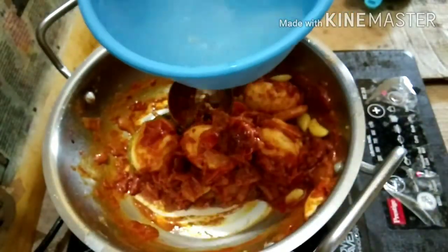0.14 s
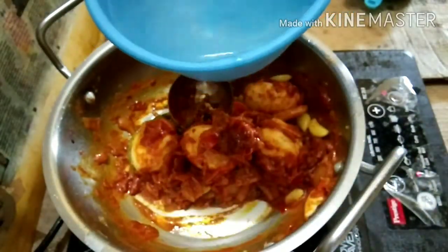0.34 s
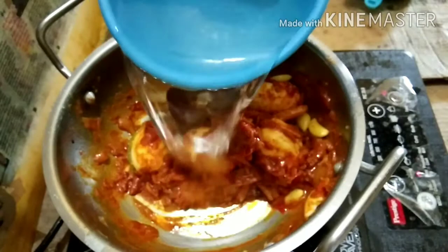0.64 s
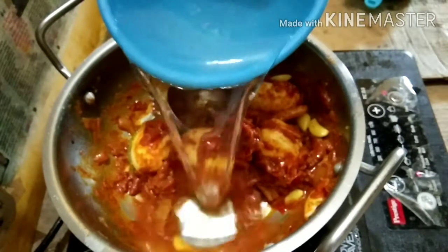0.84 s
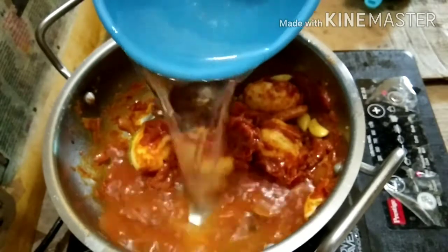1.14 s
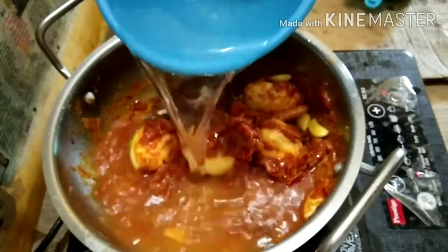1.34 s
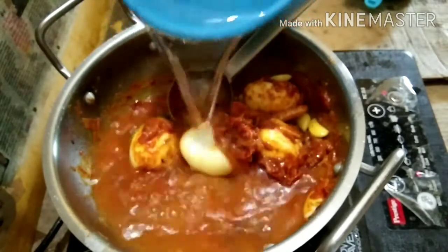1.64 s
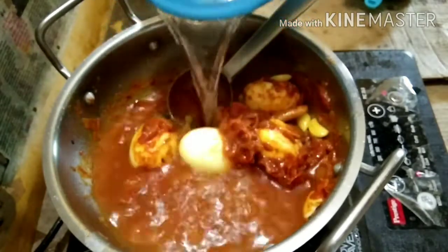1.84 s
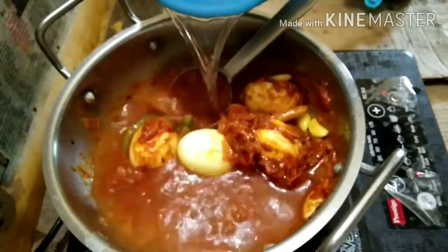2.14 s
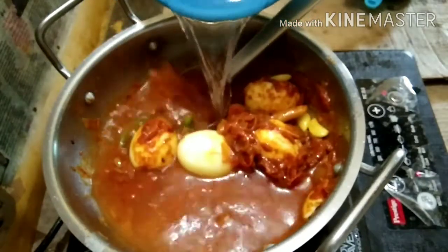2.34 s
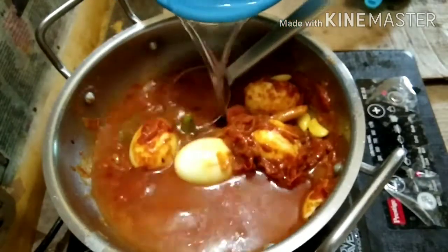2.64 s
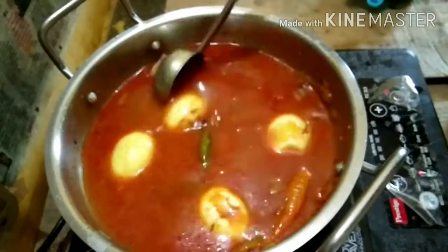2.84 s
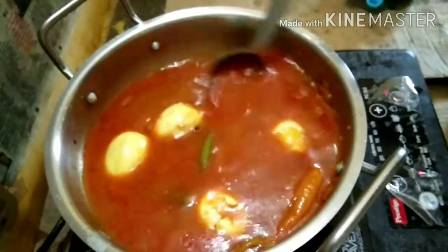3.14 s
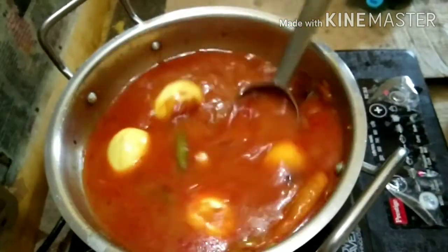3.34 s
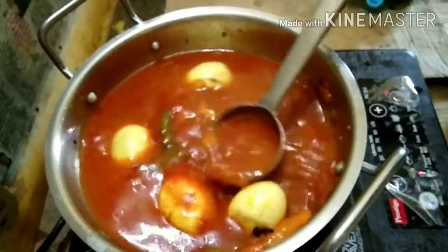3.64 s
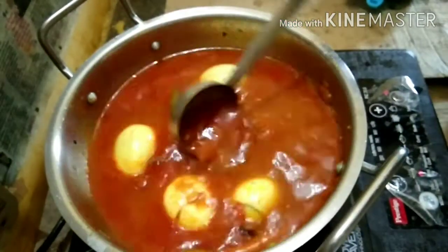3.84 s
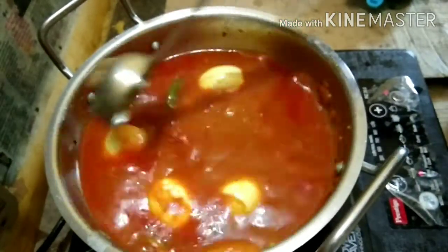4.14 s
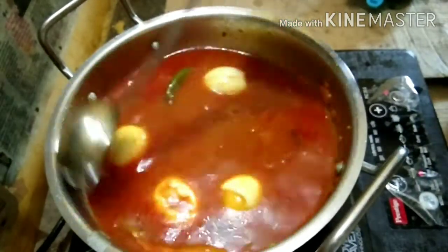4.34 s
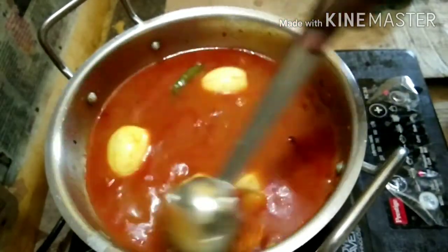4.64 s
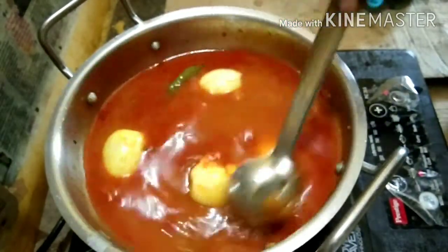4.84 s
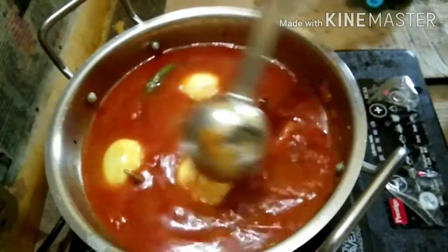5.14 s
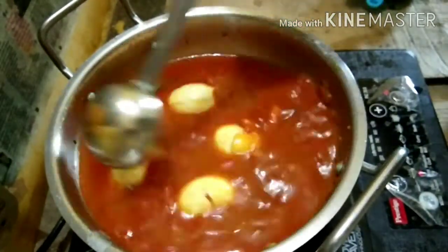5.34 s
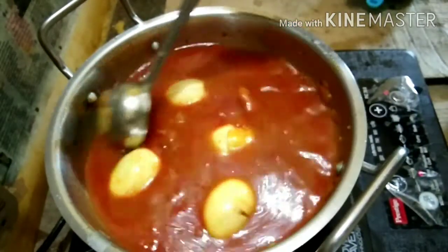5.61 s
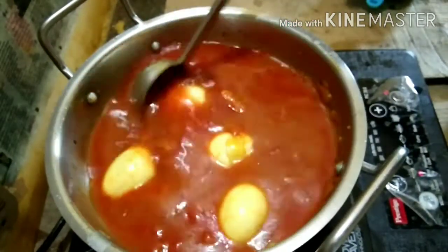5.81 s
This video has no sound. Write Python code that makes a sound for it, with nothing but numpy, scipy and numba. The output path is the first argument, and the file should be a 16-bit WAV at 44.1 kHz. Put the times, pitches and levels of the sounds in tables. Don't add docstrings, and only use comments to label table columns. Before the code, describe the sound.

A kitchen heard closely through a phone microphone, slightly dull and overloaded at peaks, with short hard-wall echo. A fan hums and blows steadily over faint simmering and distant vehicle rumble. From 0 to 1.4 seconds water pours into a steel pan of curry: rapid ringing bubbles, gurgles and crisp spitting spray, thinning mid-way as the pool deepens, then splashing up again. A sharp cut with a tiny tick follows. A steel ladle rubs and squeaks on the pan from 1.5, ticking lightly around 1.8 to 2.6 while gravy swishes. A very loud, bright clank with quick bounces rings at 2.9, followed by small squeaks. Another strong clank comes at 4.15, then scrapes, ticks and faint pings. At 4.6 a heavy low puff of air thumps the microphone, fading by 5. Scrapes at 5.0 and 5.5 lead to a softer, lower clank at 5.74 and a last swish.

```python
import sys
import numpy as np
from scipy import signal
from scipy.io import wavfile
from scipy.ndimage import uniform_filter1d
from numba import njit

SR = 44100
rng = np.random.default_rng(int(sys.argv[2]) if len(sys.argv) > 2 else 0)


def boost_factor(decibels):
    exponent = np.asarray(decibels, float) / 20
    return 10 ** exponent


def put_to_file(sound):
    columns = np.atleast_2d(sound).T
    safe = np.clip(columns, -1, 1)
    whole_steps = np.round(safe * 32767)
    wavfile.write(sys.argv[1], SR, whole_steps.astype(np.int16))


N = 263541
CUT_S = 1.4335


def level(x, db):
    return x * boost_factor(db) / np.sqrt(np.mean(x ** 2))


@njit
def svf(x, hz, width):
    y, b, l = np.empty(len(x)), 0., 0.
    for i in range(len(x)):
        g, k = np.tan(np.pi * hz[i] / SR), width[i] / hz[i]
        v = (b + g * (x[i] - l)) / (1 + g * (g + k))
        b, l, y[i] = 2 * v - b, l + 2 * g * v, k * v
    return y


def band(x, hz, width):
    hz = np.clip(hz + np.zeros(len(x)), 20, 9000)
    return svf(x, hz, np.clip(width + np.zeros(len(x)), 3, 9000))


def band_twice(x, hz, width):
    return band(band(x, hz, width), hz, width)


@njit
def grains(s, size, hz, t60, glide, rise):
    out = np.zeros(N)
    for k in range(len(s)):
        phase, i0 = 0., int(s[k] * SR)
        for i in range(i0, min(N, i0 + int(t60[k] * SR))):
            t = (i - i0) / SR
            phase += 2 * np.pi * hz[k] * (1 + glide * t / t60[k]) / SR
            out[i] += size[k] * np.sin(phase) * (1 - np.exp(-t / rise)) * 1000. ** (-t / t60[k])
    return out


def walk(rate):
    k = int(SR / rate)
    held = np.repeat(rng.standard_normal(N // k + 1), k)
    return 1.367 * uniform_filter1d(uniform_filter1d(held, k), k)[:N]


def burst(s, db, t60):
    t = np.arange(N) / SR - s
    return boost_factor(db) * (t >= 0) * 1000. ** (-np.abs(t) / max(t60, .002)) * rng.standard_normal(N)


def shot(s, db, t60, hz, width):
    out, i = np.zeros(N), int(s * SR)
    t = np.arange(min(N - i, SR // 4)) / SR
    noise = boost_factor(db) * 1000. ** (-t / max(t60, .002)) * rng.standard_normal(len(t))
    out[i:i + len(t)] = band(noise, hz, width)
    return out


def swells(rows, rise_s, fall_db_per_s):
    t = np.arange(N) / SR
    power = 0
    for s, db in rows:
        slope_db = np.minimum(20 * (t - s) / rise_s, -fall_db_per_s * (t - s))
        power = power + boost_factor(2 * (db + slope_db))
    return np.sqrt(power)


# time_s, level_db
FLOW = [(.05, -54.5), (.11, -50.5), (.27, -50.5), (.4, -51), (.54, -61.5), (.75, -58), (.95, -63),
        (1.2, -52.5), (1.42, -55)]


def stream():
    t = np.arange(N) / SR
    flow_db = np.interp(t, *np.transpose(FLOW))
    gurgle_hz = np.interp(t - .81, (-.03, .25), (3310, 2160))
    spray_hz = 4850 + 810 * np.minimum(t, CUT_S)
    plop_hz = 1494 + 0 * t
    out = 0
    for db, hz, octaves in ((-0.5, gurgle_hz, .3), (0.9, spray_hz, .33), (-3, plop_hz, .6)):
        where, pitch, life, size = rng.random((1500, 4)).T
        s = where * CUT_S
        own_hz = hz[(s * SR).astype(int)] * 2 ** (octaves * (2 * pitch - 1))
        own_hz = np.clip(own_hz, 900, 7500)
        swarm = grains(s, boost_factor(-2.8 * np.log(size)), own_hz, (15 + 40 * life) / own_hz, 0.14, 0.000059)
        flicker = boost_factor(3.5 * walk(30) + 3.3 * walk(180))
        hiss = flicker * band_twice(rng.standard_normal(N), hz, 1.9 * hz)
        out = out + boost_factor(flow_db + db) * (level(swarm, 0.5) + level(hiss, -0.4))
    return out


# start_s, peak_db, pitch_hz
BUBBLES = [(.058, -29, 3300), (0.093, -26, 3250), (0.106, -25, 3250), (.118, -28, 3200), (0.132, -26, 3210),
           (.183, -26, 3300), (.208, -25, 3250), (0.157, -16.5, 3250), (.197, -20.5, 3450),
           (0.226, -35, 1930), (0.269, -17.5, 3320), (.3381, -32, 3470), (0.373, -31, 1340),
           (0.417, -20, 3290), (0.449, -26.5, 3560), (0.6303, -27, 3470), (.645, -26, 3450),
           (.692, -22, 3300), (0.703, -22.5, 3540), (.732, -32, 2520), (0.756, -19, 3940),
           (.8116, -29.5, 2000), (.763, -25, 3500), (.856, -37.5, 2350), (0.889, -30.5, 1730),
           (0.891, -33, 1250), (0.9873, -33, 2400), (1.0286, -43, 1290), (1.04, -30, 2380),
           (1.132, -28, 1160), (1.195, -28, 1610), (1.292, -29, 2130), (1.344, -28.5, 2380),
           (1.3832, -28.5, 2450)]


def bubbles():
    s, peak_db, hz = np.transpose(BUBBLES)
    t60_s = np.minimum(58 / hz, 0.031)
    return grains(s, boost_factor(peak_db - 0.4), hz, t60_s, 0.088, 0.00089)


# start_s, peak_db, pitch_hz
SPITS = [(0.168, -25, 5330), (0.197, -26, 4600), (.2309, -16, 4600), (.2309, -15, 6400), (.233, -19, 5200),
         (.169, -25, 5900), (.196, -24, 4000), (.337, -19, 5900), (.326, -16, 5200), (0.266, -31, 4630),
         (0.289, -23, 4500), (0.3068, -18, 5220), (0.3252, -14, 4710), (.337, -13, 4700),
         (0.417, -21.5, 4520), (0.431, -19, 6100), (.48, -27, 4550), (.477, -27, 6700), (0.484, -26, 6550),
         (0.506, -19, 4550), (0.516, -16, 4400), (0.5774, -18, 6300), (0.6322, -19, 4440),
         (0.71, -23, 4570), (0.758, -18.5, 4180), (0.8915, -31, 5550), (0.9315, -31, 6030),
         (0.959, -22.5, 6200), (1.029, -15, 5630), (1.0413, -18, 5600), (1.13, -19, 5100),
         (1.168, -27, 6040), (1.195, -16, 5860), (1.2165, -19, 6380), (1.2535, -17, 6000),
         (1.272, -21, 6100), (1.285, -21, 6600), (1.293, -18.5, 6100), (1.185, -24, 6100),
         (1.208, -24, 5200), (1.226, -24, 6600), (1.408, -34, 5600), (.3068, -16, 6660), (.373, -22, 6600),
         (0.406, -23, 4700), (.465, -22, 4100), (.541, -32, 6300), (.5607, -29, 3720), (0.578, -22, 4530),
         (0.592, -22, 3970), (0.608, -26, 4860), (.649, -25, 4560), (.671, -27, 5100), (0.693, -33, 6760),
         (.785, -31, 3680), (.829, -36, 4570), (0.853, -28, 4400), (.868, -33, 4900), (.917, -26.5, 4070),
         (.985, -28, 4800), (1.0172, -24, 4060)]


def spits():
    t60_s = 0.027
    s, peak_db, hz = np.transpose(SPITS)
    out = grains(s, boost_factor(peak_db - 7), hz, t60_s + 0 * s, 0.11, 0.00083)
    for s, db, hz in SPITS:
        out = out + shot(s, db - 2.5, t60_s, hz, 0.14 * hz)
        out = out + shot(s, db - 8, 0.0035, hz, 0.69 * hz)
    return out


# start_s, length_s, pitch_hz, level_db
RUMBLE = [
    (0, .2, 64, -61.5),
    (.25, 0.66, 63.3, -57),
    (1.025, 0.5, 94, -57),
    (1.455, 0.33, 99, -52.5),
    (0, 5.97, 60.4, -66),
    (2.94, 0.27, 66, -58),
    (3.25, 0.47, 68, -64.5),
    (5.786, .2, 69, -60),
]


def rumble():
    t, noise = np.arange(N) / SR, rng.standard_normal(N)
    out = 0
    for s, length, hz, db in RUMBLE:
        fade = np.clip(np.minimum(t - s, s + length - t) / 0.031 + 1, 0, 1)
        out = out + fade * level(band_twice(noise, hz, 28), db)
    return out


# pitch_hz, level_db (per Hz)
KITCHEN = [(15, -82), (25, -39), (54, -26.5), (184, -10), (245, -8.5), (312, -4.5), (480, -10.5),
           (529, -17.5), (919, -13), (1090, -16.5), (1420, -19.5), (2580, -24.5), (2780, -28.5),
           (6440, -38), (7800, -84), (10100, -94), (17200, -120)]
# pitch_hz, level_db
FAN = [(140.0, -56.5), (209.9, -54), (246.2, -44), (279.9, -80.5), (489.9, -52.5), (737.5, -52.5),
       (845.2, -57.5), (985.1, -56), (1125, -55.5), (1265, -61.5)]


def kitchen():
    hz, db = np.transpose(KITCHEN)
    swell = walk(0.72)
    air = 0
    for f in 89 * 2 ** np.arange(0, 6.5, 1 / 3):
        band_db = np.interp(np.log(f), np.log(hz), db)
        flicker_db = 0.09 * swell + min(f / 600, 1.5) * walk(8.1)
        air = air + boost_factor(band_db + flicker_db) * band_twice(rng.standard_normal(N), f, f / 3)
    shaft = np.cumsum(1 + 0.00277 * walk(3)) / SR
    hum = sum(boost_factor(d - 0.5 + 1.32 * walk(11)) * np.sin(2 * np.pi * f * shaft + f) for f, d in FAN)
    return level(air, -43) + hum


# start_s, level_db
PUSHES = [
    (1.75, -40),
    (3.11, -43),
    (4.31, -34.5),
    (4.62, -50),
    (5.86, -41),
]


def swish():
    gain = boost_factor(-55.5) + swells(PUSHES, rise_s=0.086, fall_db_per_s=42.5)
    flicker = boost_factor(0.66 * walk(32) - 9.5)
    return gain * flicker * level(band(rng.standard_normal(N), 2300, 2600), 0)


# start_s, length_s, pitch_hz, level_db
SQUEAKS = [(1.574, 0.12, 2170, -47), (1.69, 0.15, 3190, -55), (1.575, .05, 5000, -53),
           (1.579, 0.1, 5740, -52), (2.08, 0.063, 2510, -56), (2.222, 0.057, 2620, -45),
           (2.399, 0.086, 2104, -51.5), (2.942, 0.22, 1934, -45), (3.06, .24, 3600, -42),
           (3.375, 0.05, 2440, -49), (3.36, 0.09, 3080, -53), (3.472, 0.033, 2570, -45.5),
           (3.49, 0.044, 2300, -44), (3.498, 0.049, 4610, -58), (3.666, 0.12, 2680, -46),
           (3.78, .09, 2670, -52), (3.71, 0.05, 2355, -51), (3.73, .04, 1980, -53),
           (3.546, 0.14, 2300, -52), (3.892, 0.043, 6300, -54.5), (3.9, 0.07, 4690, -45.5),
           (3.896, 0.03, 3170, -47.5), (3.92, .14, 3160, -52), (3.93, .13, 3620, -50),
           (3.93, .08, 4400, -47), (3.94, .05, 2150, -54), (4.298, .06, 2370, -49),
           (4.348, 0.039, 5070, -43), (4.423, 0.03, 3325, -46), (4.35, 0.026, 3380, -44),
           (4.6, 0.029, 2300, -49), (4.702, 0.056, 2497, -53), (5.058, 0.16, 5810, -47.5),
           (5.495, 0.16, 5310, -45), (5.51, .12, 4400, -45), (5.6, .12, 3900, -49), (5.555, .12, 2620, -46),
           (5.723, .025, 2900, -43), (5.66, 0.077, 1973, -47)]
RUBS = [(1.025, 0.036, 2400, -37), (1.031, 0.031, 6000, -37), (1.518, .095, 3700, -35.5),
        (1.591, 0.071, 4300, -46), (1.61, .13, 3100, -39), (1.518, .08, 4250, -41),
        (5.05, 0.089, 3160, -41), (5.59, 0.14, 3200, -44), (1.82, 0.12, 3500, -50.5),
        (2.23, 0.12, 3700, -58), (3.285, .12, 3920, -47.5), (3.36, 0.045, 2740, -50),
        (3.913, 0.11, 4020, -44), (4.098, .06, 4400, -44), (4.98, 0.083, 5850, -45.5),
        (5.011, 0.1, 5170, -34.5), (5.029, 0.09, 3900, -42.5), (5.058, 0.04, 6170, -36.5),
        (5.478, 0.031, 6170, -47), (5.495, 0.088, 5350, -44), (5.506, 0.11, 4400, -37.5),
        (5.802, 0.056, 2400, -48.5), (5.86, 0.073, 1330, -42.5), (5.848, 0.018, 4960, -44.5),
        (5.871, 0.056, 5900, -51), (2.94, 0.3, 371, -41.5), (4.288, 0.14, 343.5, -41.5),
        (5.764, 0.086, 353, -36)]
RATTLES = [(1.75, .12, 750, -47), (3.52, 0.24, 3600, -56), (1.6, .2, 2500, -50), (1.56, 0.13, 3900, -42),
           (1.82, 0.11, 5600, -43.5), (2.98, 0.17, 4300, -37.5), (4.32, .14, 5580, -39),
           (4.51, 0.12, 4100, -49.5), (4.699, 0.11, 4600, -49.5), (3.901, .15, 4200, -50.5),
           (5.01, 0.14, 4660, -39), (5.171, 0.1, 4650, -53), (5.5, 0.3, 4280, -47.5)]
# width (share of pitch), last over first pitch, steady tone (share),
# swell (share of length), fade_db_per_s
KINDS = [
    (.05, 0.985, .45, .22, 220),
    (.17, 0.948, 0.0, .08, 135),
    (.7, 0.91, 0.0, .12, 135),
]


def scrape():
    out = np.zeros(N)
    rows = [row + kind for table, kind in zip((SQUEAKS, RUBS, RATTLES), KINDS) for row in table]
    for s, length, first_hz, db, share, sag, steady, swell, fade in rows:
        i = int(s * SR)
        t = np.arange(min(N - i, int(SR * (length + 0.35)))) / SR
        hz = np.interp(t, (0, length), (first_hz, sag * first_hz))
        width_hz = share * first_hz
        halo = band_twice(rng.standard_normal(len(t)), hz, width_hz + 500)
        rough = level(0.4 * halo + band_twice(halo, hz, width_hz), 0)
        wavering_hz = hz * (1 + .009 * walk(70)[:len(t)])
        tone = np.sin(2 * np.pi * np.cumsum(wavering_hz) / SR)
        sing = level(rough * (1 - steady) + 0.98 * steady * tone, db)
        sing = sing * boost_factor(1.5 * walk(60)[:len(t)])
        bite = np.minimum(t / (0.009 + swell * length), 1)
        out[i:i + len(t)] += sing * bite * boost_factor(-7 * t / length - fade * np.maximum(t - length, 0))
    out = out * boost_factor(walk(80))
    fine_hz = 1150 * 2 ** np.cumsum(0.095 * rng.random(66))
    lines = sum((-1) ** k * band(out, f, 40) for k, f in enumerate(fine_hz))
    return lines + boost_factor(1.5) * out


# start_s, peak_db,
# centre_hz, thud_db
TICKS = [(1.0297, -17, 2080, -43), (1.039, -17.5, 5900, -34), (1.7815, -21.5, 3900, -25.5),
         (1.791, -23, 5460, -42), (1.9797, -19.5, 2200, -49), (2.196, -32, 4930, -45),
         (2.2314, -32, 4350, -43), (2.396, -24.5, 2270, -43), (2.4236, -33, 2080, -34),
         (2.64, -36.5, 3230, -42), (3.312, -44, 5700, -48), (3.503, -46, 6200, -33),
         (4.2886, -21.5, 5100, -28), (4.289, -19, 2100, -46), (4.5388, -35, 4570, -51),
         (4.7593, -35, 5000, -51), (4.79, -36, 4600, -52), (4.3881, -18, 4600, -40),
         (4.6235, -34, 5360, -17), (5.016, -30, 5200, -50), (5.2793, -34.5, 4190, -60),
         (5.409, -41, 5500, -56), (5.433, -46, 6200, -47)]


def ticks():
    s, _, _, thud_db = np.transpose(TICKS)
    out = grains(s, boost_factor(thud_db - 2.0), 350 + 0 * s, 0.093 + 0 * s, 0., 0.0011)
    for s, db, hz, _ in TICKS:
        click = shot(s, db - 4.5, 0.017, 3000, 5200)
        shimmer = shot(s, db - 4, 0.11, hz, 0.42 * hz)
        out = out + click + shimmer
    return out


# start_s, peak_db, pitch_hz
PINGS = [(1.833, -36, 3400), (3.3118, -44, 5300), (3.503, -42, 5700), (3.503, -42, 6600),
         (4.318, -34, 2100), (4.362, -30, 5000), (4.365, -34, 3400), (4.392, -30, 5900), (4.409, -33, 3300),
         (4.5268, -36, 4810), (4.5388, -36, 4570), (4.5847, -36, 3100), (4.5847, -39, 4800),
         (4.598, -38, 6000), (4.6236, -30, 5360), (4.6245, -33, 3450), (4.6245, -36, 4400),
         (4.7074, -36, 4480), (4.722, -38, 6300), (4.7593, -35, 6200), (4.77, -38, 4400),
         (4.805, -38, 4700)]


def pings():
    t60_s = .035
    s, db, hz = np.transpose(PINGS)
    tones = grains(s, boost_factor(db), hz, t60_s + 0 * s, 0., .0012)
    return tones + sum(shot(s, db + 6, t60_s, hz, .12 * hz) for s, db, hz in PINGS)


# start_s, peak_db, crack_db, tail_t60_s, spread (share of pitch)
CLANKS = [
    (2.919, 1, -2.5, 0.25, .03),
    (2.9309, -8, -5, 0.39, .03),
    (2.9375, -14, -3, 0.37, .03),
    (4.154, -0.5, -12, 0.34, 0.011),
    (5.738, -15, -10.5, 0.46, .04),
]
DAMPED_S = [2.9405, 2.9405, 2.9405, 4.18, 5.758]
# pitch_hz, level_db, t60_s
RIM = [(406, -13, 0.5), (1091, -27.5, 1.7), (1320, -22, 0.72), (1850, -4, 0.21), (2183, -7, 0.12),
       (2400, -12.5, 0.37), (2766, -1.5, 0.094), (3020, -13, 0.15), (2520, -14, 0.3), (3160, -21, 0.34),
       (3488, -14, 0.3), (4164, -17, 0.43), (4410, -8, 0.14), (3900, -6, 0.052), (1458, -9, .06),
       (1790, -6, .2), (4760, -2, 0.061), (4955, -3.5, 0.13), (5350, -8, 0.22), (5500, -14, 0.12),
       (5700, -28.5, 0.4), (6030, -14, 0.18), (6800, -22, 0.19), (6260, -15.5, 0.2)]
BOWL = [(415, -21, 0.35), (810, -25.5, .1), (1404, -15, 0.041), (1790, -9, 0.15), (1868, 5, 0.13),
        (2300, -22.5, 0.11), (2730, -10.5, 0.14), (3240, -22, .15), (3720, 0, 0.08), (3612, -3, 0.088),
        (4300, -8, 0.08), (4830, -7.5, 0.14), (5300, -20.5, 0.15), (5450, 2, 0.035), (6170, -15, 0.063),
        (6630, -11, 0.094), (7080, -10, 0.035)]
BASE = [(348, -1.5, 0.15), (1400, -10, 0.12), (1760, -1.5, 0.19), (2030, -3, 0.4), (1600, -9, 0.12),
        (2150, -8, .15), (2260, -7, 0.31), (3275, -8, 0.32), (3560, -28, 0.37), (3800, -37, 0.74),
        (4430, -10.5, 0.14), (5669, -23, 0.1), (6300, -14, 0.28)]
# pitch_hz, level_db, t60_s
RIM_LOW = [(333, -13, 0.3), (260, -18, .14), (427.6, -17, 0.44)]


def clanks():
    out, t = 0, np.arange(N) / SR
    struck = (RIM + RIM_LOW, RIM, RIM, BOWL, BASE)
    for (s, db, crack_db, t60, spread), damped, modes in zip(CLANKS, DAMPED_S, struck):
        hz, mode_db, ring = np.repeat(modes, 8, axis=0).T
        late, off, size, life = rng.random((len(hz), 4)).T
        starts = s + 0.003997 * late ** 3
        sizes = boost_factor(db + mode_db - 16.5 - 5.6 * size)
        own_hz = hz * (1 + spread * (2 * off - 1))
        own_t60 = np.clip(ring, .03, .35) * (.5 + 0.97 * life)
        cluster = grains(starts, sizes, own_hz, own_t60, 0., 0.0015)
        hz, mode_db, ring = np.transpose(modes)
        sizes = (-1) ** np.arange(len(hz)) * boost_factor(db + mode_db - 13)
        cluster = cluster + grains(s + 0 * hz, sizes, hz, np.clip(ring, .03, .35), 0., .0008)
        settle = boost_factor(-7 * np.clip((t - damped) / .004, 0, 1))
        crack = band_twice(burst(s, db + crack_db + 5.0, 0.032), 3800, 5000)
        tail = band(band(burst(s, db - 17, t60), 2400, 7800), 2900, 7800)
        out = out + settle * (cluster + crack) + tail
    return out


# start_s, level_db
GUSTS = [
    (4.62, -18.5),
    (4.766, -29),
    (4.828, -28.5),
    (4.99, -44),
    (5.06, -44.5),
]
# start_s, peak_db, pitch_hz
BUMPS = [(3.15, -24.5, 138), (4.614, -7.5, 130), (4.623, -0.5, 196), (4.649, -6, 153), (4.679, -12, 181),
         (4.709, -16, 105), (4.732, -16, 120), (4.757, -12.5, 110), (4.808, -12, 132), (4.828, -12, 88.8),
         (4.858, -14, 76), (4.899, -18.5, 64.6), (4.95, -21, 113), (5.069, -20.5, 99)]


def puff():
    top_hz = 197
    air = level(band(rng.standard_normal(N), 140, 110), 0)
    air = band(air * boost_factor(2.8 * walk(40)), 0.71 * top_hz, top_hz)
    s, peak_db, hz = np.transpose(BUMPS)
    bumps = grains(s, boost_factor(peak_db + 1.5), hz, 5.8 / hz, -0.0019, 0.001)
    slap = band_twice(burst(4.616, 1, 0.095), 350, 220)
    return swells(GUSTS, rise_s=0.015, fall_db_per_s=137.5) * air + bumps + slap


def scene():
    walls = burst(.004, -43, .32)[:SR // 2]
    pour = stream() + bubbles() + spits()
    stir = swish() + scrape() + ticks() + pings() + clanks()
    pour, stir = (x + signal.fftconvolve(x, walls)[:N] for x in (pour, stir))
    pouring = np.arange(N) < CUT_S * SR
    return (pour * pouring + stir + puff() + kitchen() + rumble())[None]


def top_cut(x):
    return signal.sosfilt(signal.butter(12, 15460, fs=SR, output="sos"), x)


def record(dry):
    x = .72 * np.tanh(dry / .72)
    x = signal.sosfilt(signal.butter(4, 50, "high", fs=SR, output="sos"), x)
    x = signal.sosfilt(signal.cheby1(10, .5, 6960, fs=SR, output="sos"), x)
    x = x - .009 * x ** 3
    x[:, int(CUT_S * SR)] += boost_factor(-33)
    x = x + boost_factor(-94) * np.diff(rng.standard_normal(N + 1))
    return top_cut(x)


dry = scene()
out = record(dry)
put_to_file(out)
```